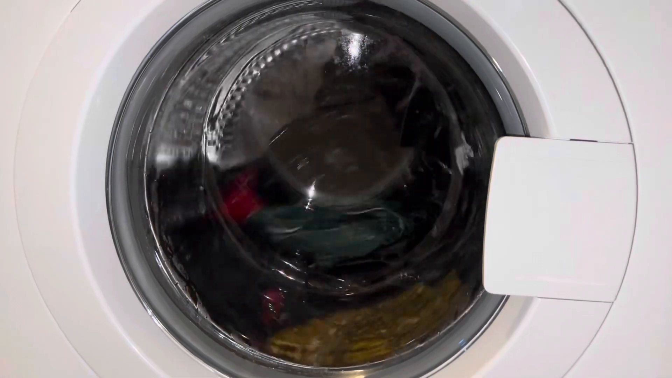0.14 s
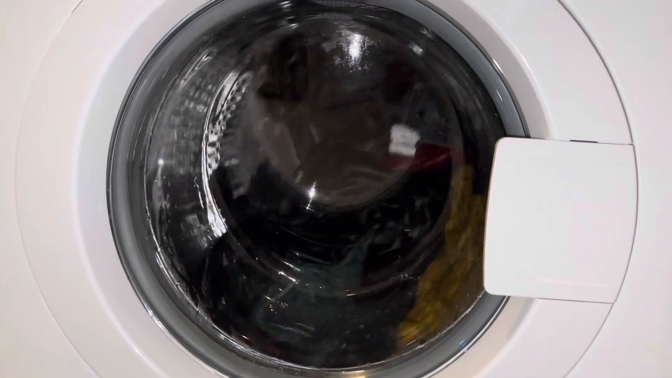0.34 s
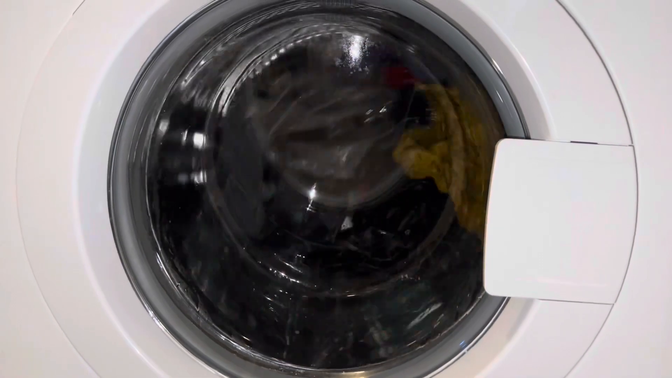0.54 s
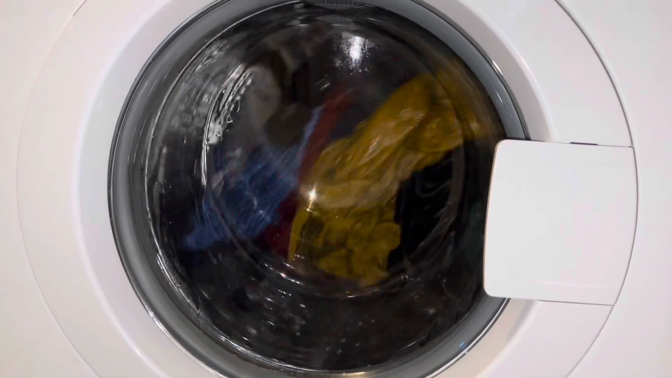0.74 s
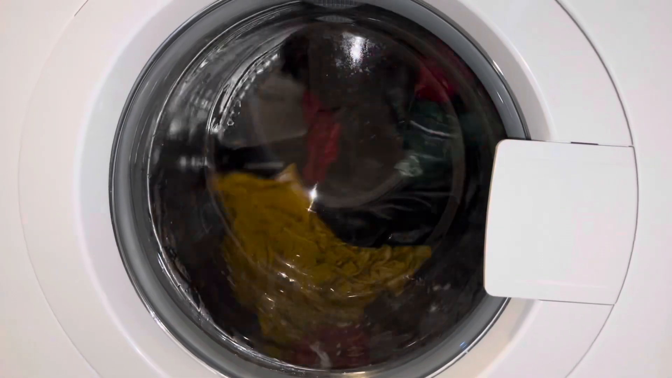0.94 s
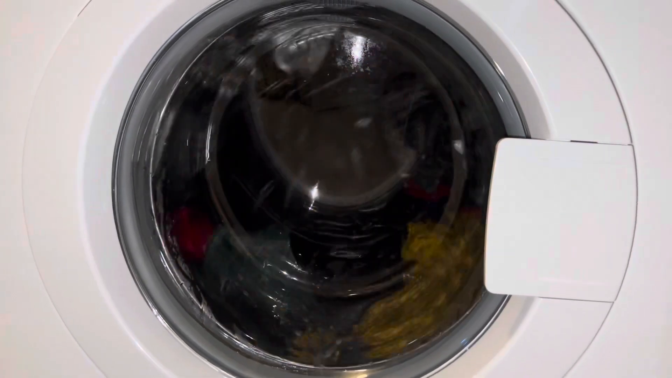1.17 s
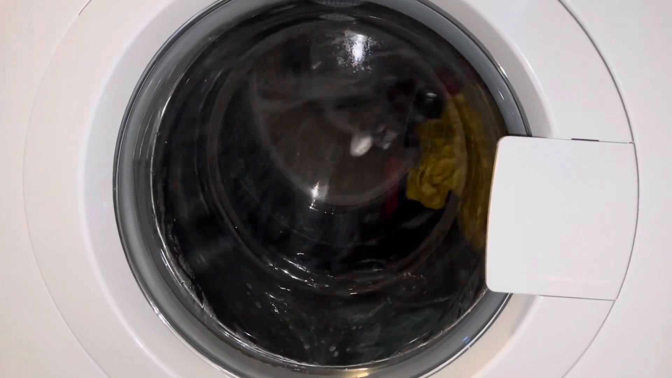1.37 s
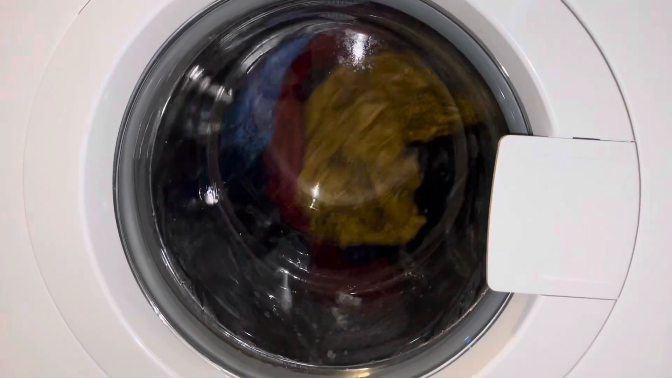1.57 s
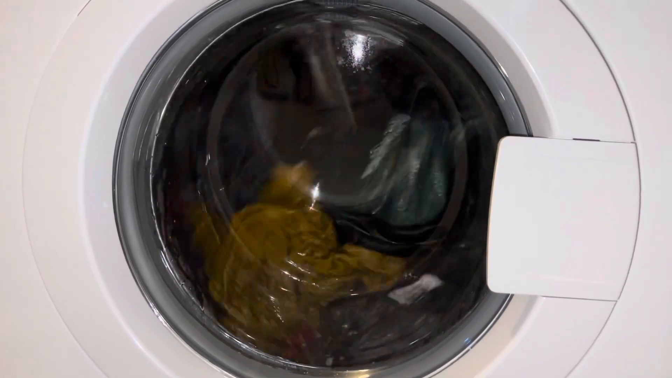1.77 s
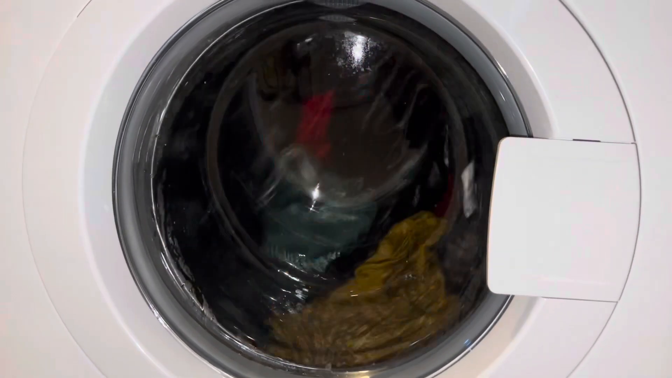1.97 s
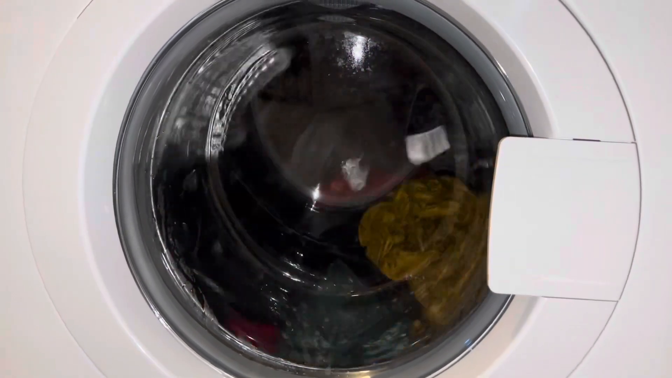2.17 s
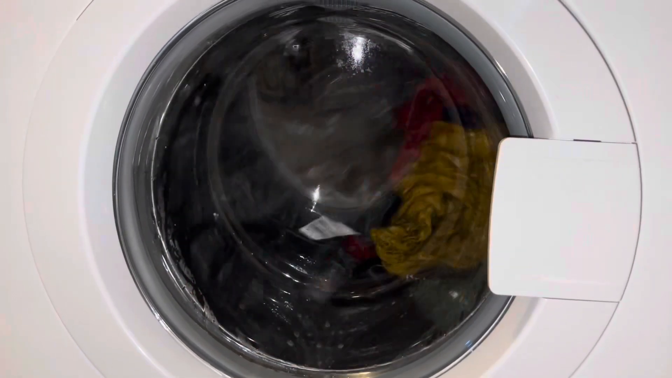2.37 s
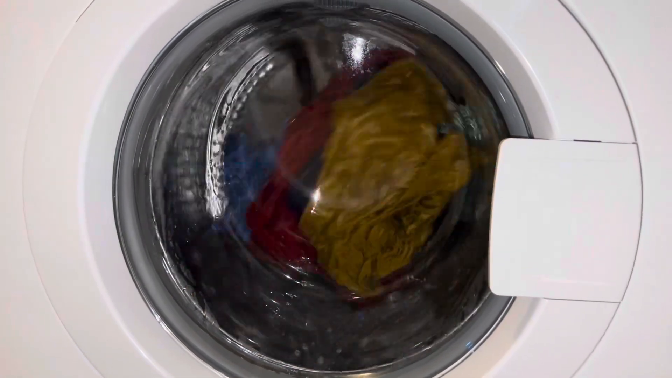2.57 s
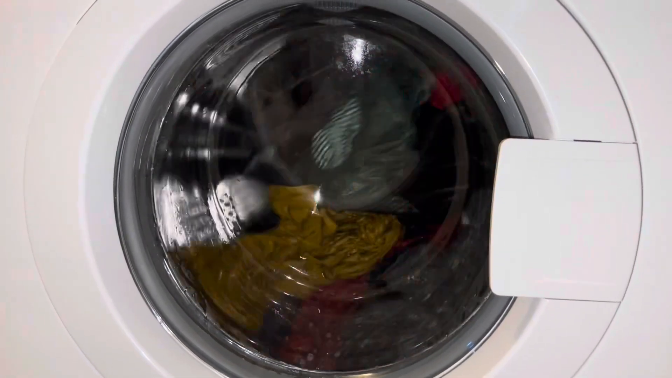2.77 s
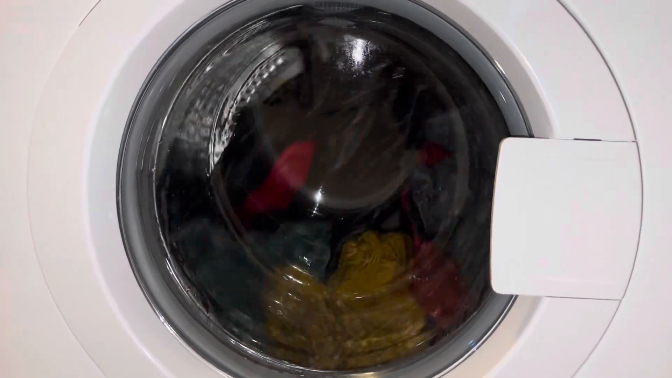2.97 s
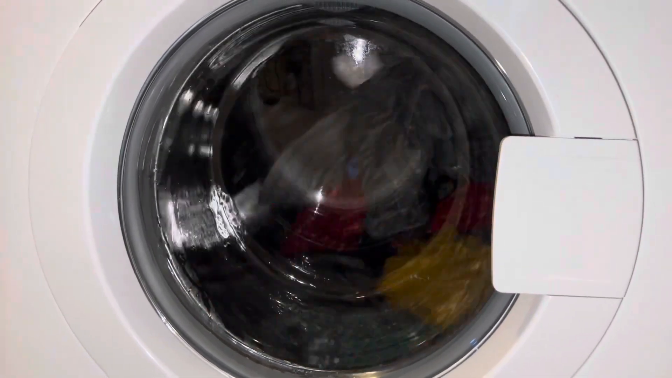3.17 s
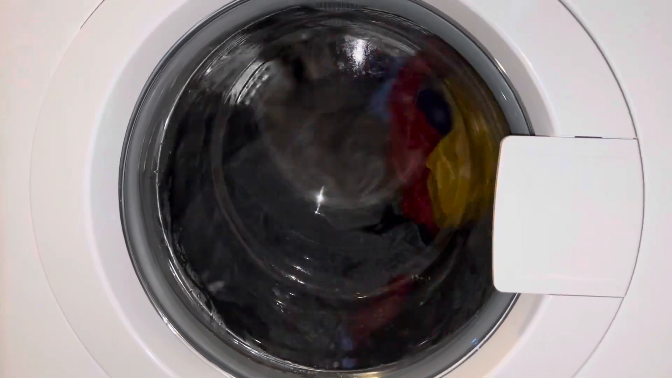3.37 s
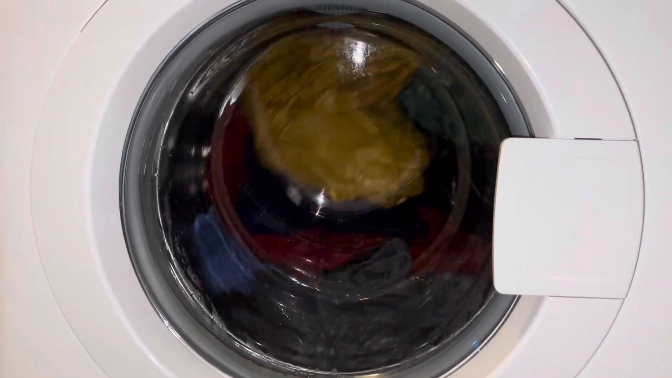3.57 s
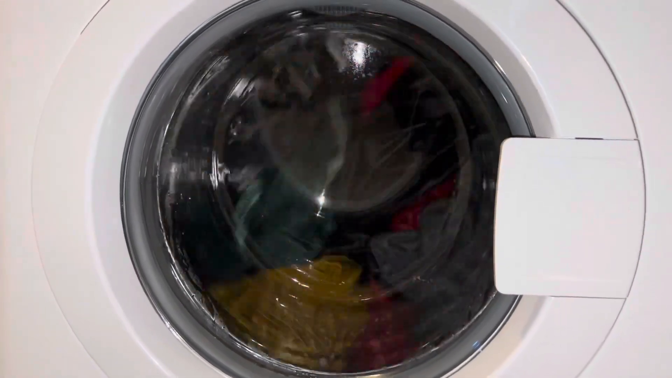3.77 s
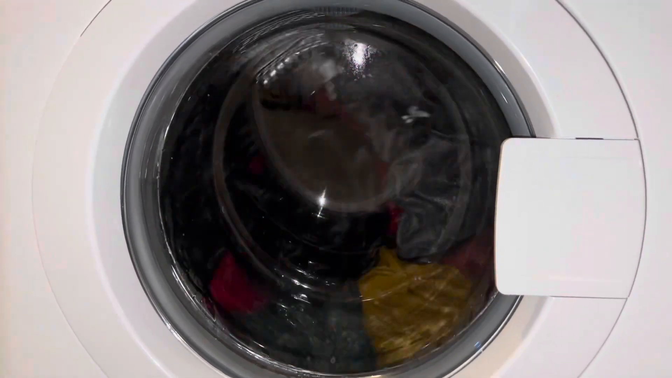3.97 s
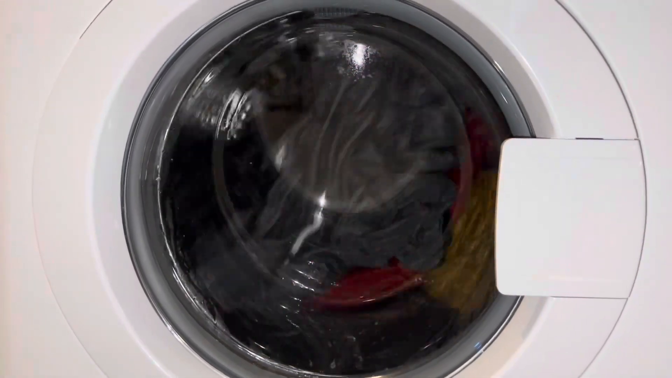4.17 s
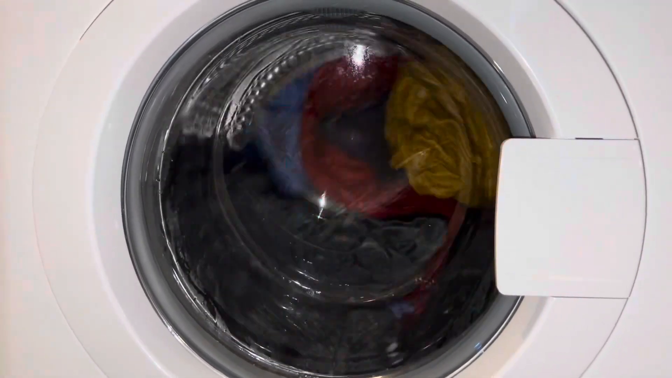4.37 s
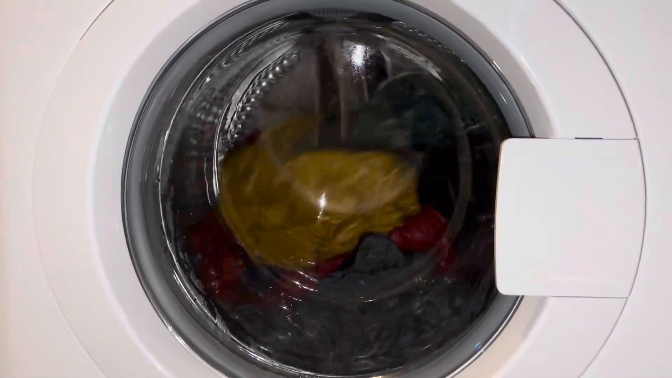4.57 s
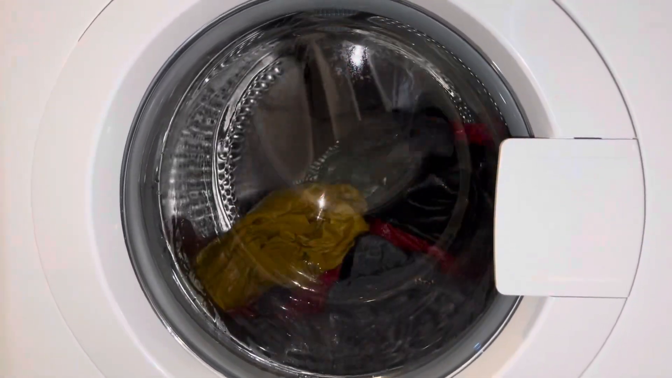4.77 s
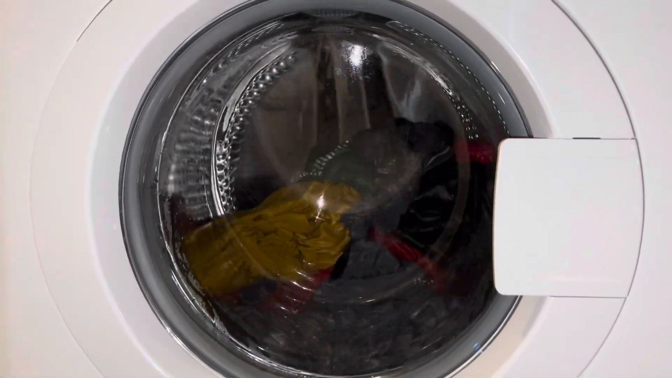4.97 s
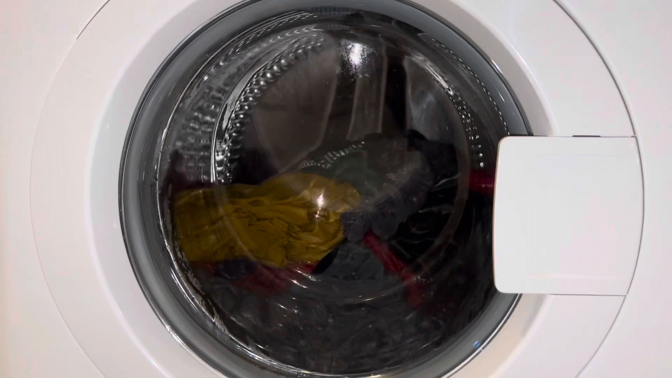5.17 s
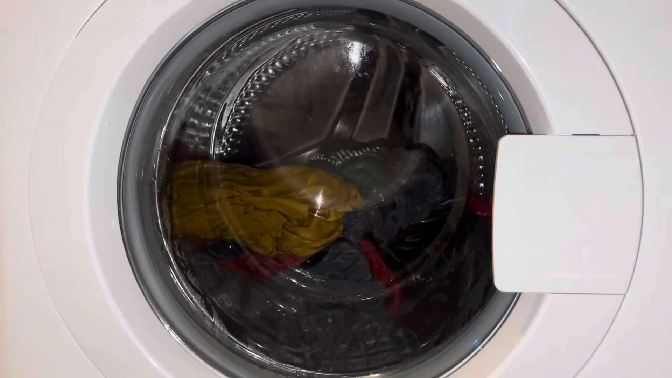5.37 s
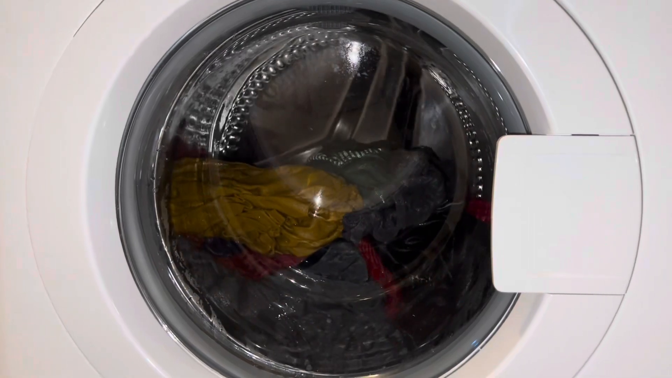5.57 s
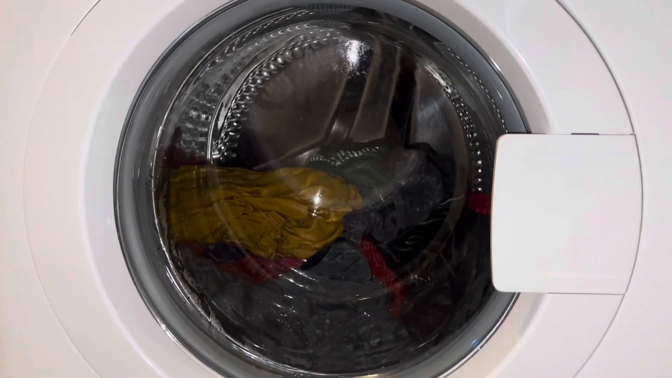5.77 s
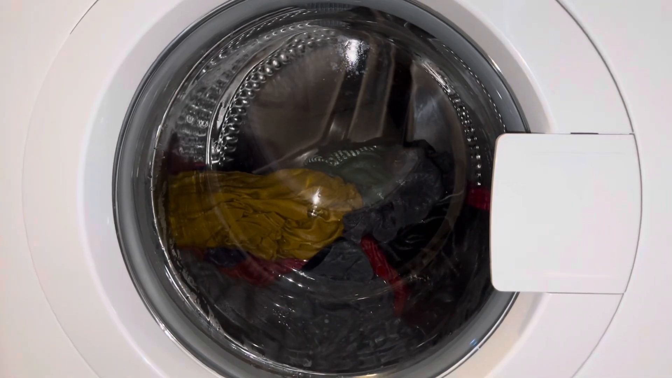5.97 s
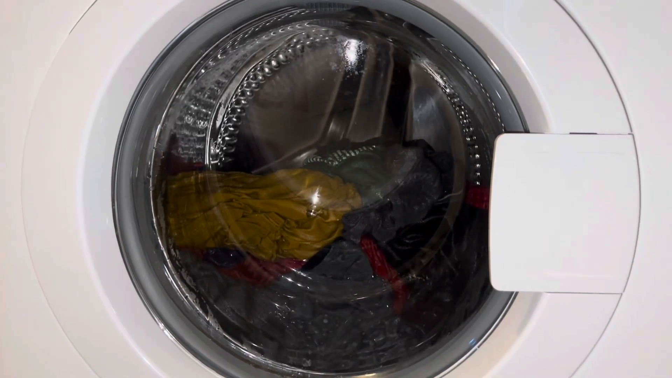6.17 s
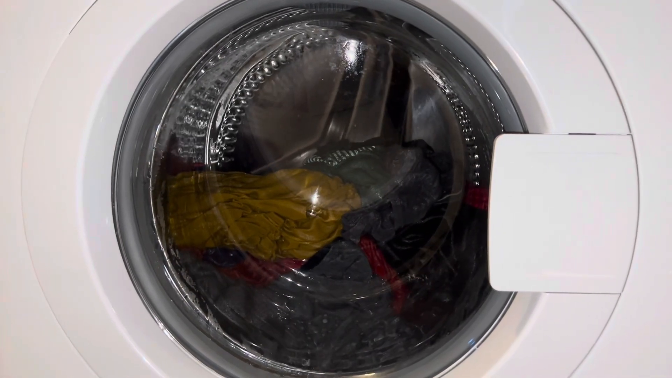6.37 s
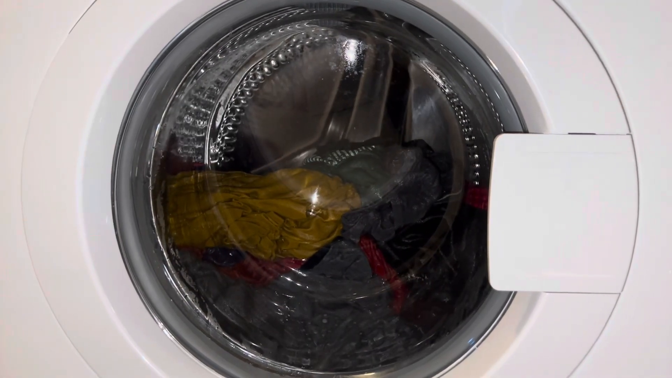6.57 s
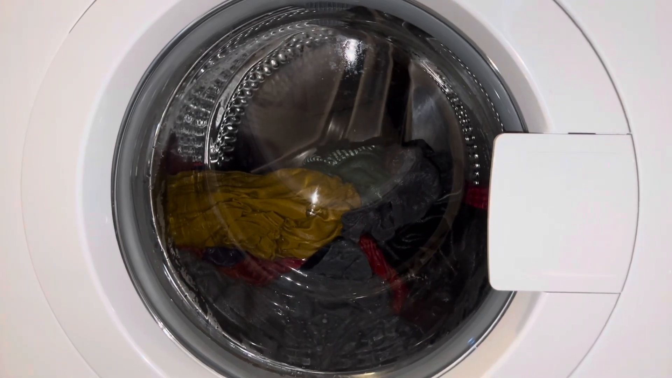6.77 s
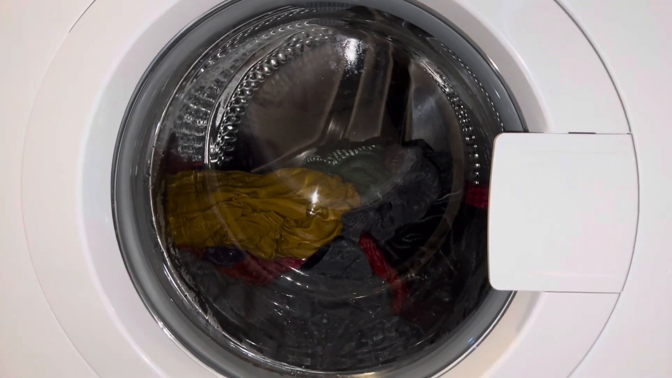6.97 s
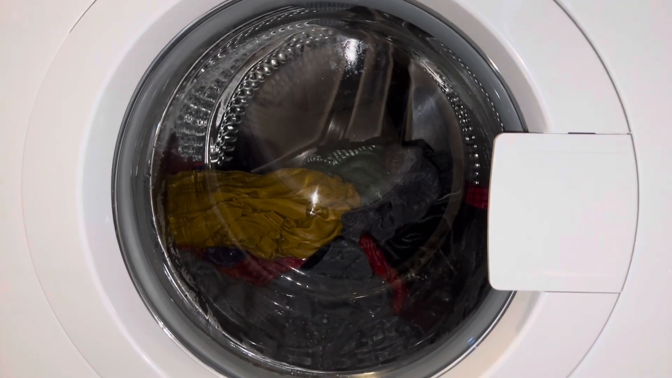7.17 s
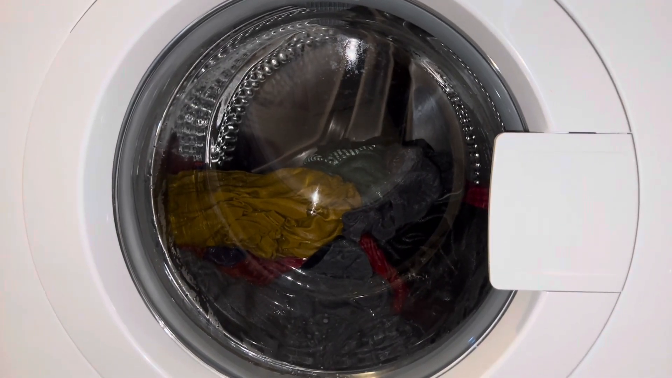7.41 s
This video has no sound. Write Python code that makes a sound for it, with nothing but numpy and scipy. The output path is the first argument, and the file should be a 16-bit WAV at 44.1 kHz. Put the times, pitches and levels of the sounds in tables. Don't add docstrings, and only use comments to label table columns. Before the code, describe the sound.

Close in front of a front-loading washer in a small hard room, a steady low electric hum and a wavering, buzzing motor whine run under sloshing water and irregular dull slaps and thuds of wet cloth. After over four seconds the motor cuts off abruptly and the drum comes to rest. The heap slips softly, water glugs faintly, then a single relay click snaps over quiet room hiss.

```python
import sys
import numpy as np
from scipy import signal
from scipy.fft import rfft, irfft
from scipy.io import wavfile
from scipy.ndimage import uniform_filter1d

SR = 44100
rng = np.random.default_rng(int(sys.argv[2]) if len(sys.argv) > 2 else 0)


def voltage_ratio(decibels):
    exponent = np.asarray(decibels, float) / 20
    return 10 ** exponent


def wav_record(signal):
    frames = np.transpose(np.atleast_2d(signal))
    bounded = np.clip(frames, -1, 1)
    quanta = np.round(bounded * 32767).astype(np.int16)
    wavfile.write(sys.argv[1], SR, quanta)


N = 328104
TIME_S = np.arange(N) / SR


def unit(x):
    return x / np.sqrt(np.mean(x ** 2) + 1e-20)


def in_time(rows):
    s, *columns = np.transpose(rows)
    return [np.interp(TIME_S, s, c) for c in columns]


def at_hz(points, hz):
    point_hz, value = np.array(points)[:, :2].T
    return np.interp(np.log(hz), np.log(np.maximum(point_hz, 1)), value)


def drift(rate):
    r = np.exp(-80 * np.pi * rate / SR)
    slow = signal.lfilter([1], [1, -2 * r, r * r], rng.standard_normal(N // 40 + 2002))[2000:]
    return np.interp(np.arange(N) / 40, np.arange(len(slow)), unit(slow))


def pan(db):
    return voltage_ratio(np.array([[.5], [-.5]]) * db)


def resonance(x, hz, width_hz):
    r = np.exp(-np.pi * width_hz / SR)
    poles = [1, -2 * r * np.cos(2 * np.pi * hz / SR), r * r]
    return signal.lfilter(np.array([1, 0, -1]) * (1 - r * r) / 2, poles, x)


# hz, left_right_likeness (ratio)
LIKENESS = [(60, 2), (130, 0.5), (290, 1.34), (640, 0.47), (1410, -0.25), (3100, 0.1), (6820, 0.37),
            (15000, -12)]


def pair(hz, length, wide=1):
    mid, side = rng.standard_normal((2, length))
    alike = np.clip(at_hz(LIKENESS, hz) / wide, 0, 1)
    return np.sqrt(.5 + alike / 2) * mid + np.sqrt(.5 - alike / 2) * side * [[1], [-1]]


def coloured(spectrum, lean, patchy_db=0, wide=1, same=1):
    hz = np.maximum(np.fft.rfftfreq(N, 1 / SR), 1)
    mid, apart = rfft(rng.standard_normal((2, N))) * voltage_ratio(at_hz(spectrum, hz))
    paths = np.interp(hz, np.arange(150) * 150, np.cumsum(rng.normal(0, 1.2, 150)))
    same = np.clip(same, 0, 1)
    side = np.sqrt(same) * mid * 1j * np.sign(np.sin(paths)) + np.sqrt(1 - same) * apart
    alike = np.clip(at_hz(LIKENESS, hz) / wide, .1, .98)
    both = np.sqrt(1 + alike) * mid + np.sqrt(1 - alike) * side * [[1], [-1]]
    both = both * pan(at_hz(lean, hz))
    if not patchy_db:
        return unit(irfft(both, N))
    out, together = 0, drift(1.9)
    for centre in np.arange(np.log2(spectrum[1][0]) - .5, np.log2(spectrum[-2][0]) + 1):
        share = np.cos(np.pi / 2 * np.clip(np.log2(hz) - centre, -1, 1)) ** 2
        out = out + irfft(both * share, N) * voltage_ratio(patchy_db * (1.04 * together + drift(7.6)))
    return unit(out)


def burst(rise_s, t60):
    t = np.arange(int((rise_s + t60) * SR)) / SR
    rise = np.sin(np.pi / 2 * np.minimum(t / rise_s, 1)) ** 2
    return rise * voltage_ratio(-60 * np.maximum(t - rise_s, 0) / t60)


def add(out, s, sound):
    i = int(s * SR)
    out[:, i:i + sound.shape[-1]] += sound[..., :N - i]


MAINS_HZ = 99.97
POWER_CUT_S, HUM_RING_S = 4.35, 0.18
MEAN_EFFORT_DB = -35
# start_s, level_db
EFFORT = [(0.0, -44.5), (0.25, -34.5), (0.48, -30.5), (0.55, -35.5), (1.25, -32.5), (1.33, -36),
          (1.59, -36), (1.8, -44), (1.99, -37.5), (2.22, -38.5), (2.34, -33), (2.56, -39.5), (3.19, -34.5),
          (3.34, -37.5), (3.46, -36.5), (3.69, -39), (4.03, -35.5), (4.36, -41)]
# start_s, level_db
SWAY = [(0, -7.5), (.3, -4.5), (.55, 1), (1.15, -5), (1.3, -2), (2.3, -3), (3.1, 0), (3.28, -7.5),
        (3.45, -1.5), (4.3, -1)]
# multiple of the pull, level_db at mean effort, effort_share, sway_share, left_right_db
HUM_LINES = [(1, -39, 0.72, 0.97, -1), (2, -34.5, 0.95, .01, -3.5), (3, -50.5, 0.4, 1.2, -9.5),
             (4, -57, 0.76, 1, 4)]


def hum():
    turn = 2 * np.pi * MAINS_HZ * TIME_S
    cut_s = np.maximum(TIME_S - POWER_CUT_S, 0)
    swing_db, sway_db = in_time(EFFORT)[0] - MEAN_EFFORT_DB, in_time(SWAY)[0]
    out = 0
    for k, db, follows, sways, lean_db in HUM_LINES:
        line = np.sin(k * turn + 0.48 * drift(4.7))
        level_db = db + 3.5 + follows * swing_db + sways * sway_db + 1.29 * drift(19.0)
        out = out + pan(lean_db) * line * voltage_ratio(level_db - 60 * k * cut_s / HUM_RING_S)
    return out


TONE_DB, TONE_WANDER_DB = -54.5, 1.5
STRAND_WAVER = .0065
# bar_rate_share, level_db
STRANDS = [(1.004, 0), (.974, -5)]


def commutator_tone(speed_hz, press_db, chop):
    level_db = TONE_DB + 1.3 * press_db + TONE_WANDER_DB * drift(4.5)
    tone = 0
    for share, db in STRANDS:
        turn = 2 * np.pi * np.cumsum(speed_hz * (share + STRAND_WAVER * drift(17))) / SR
        port_phase = [[0], [1]] * (1.26 + 0.16 * drift(13))
        tone = tone + np.sin(turn + port_phase) * voltage_ratio(db + 2.6 * drift(18))
    return voltage_ratio(level_db + 2.5) * unit(tone * chop) * pan(-4.0)


BUZZ_DB = -51.5
LINE_FOLLOWS, LINE_WAVER = .07, .0012
# pitch_hz, width_hz, level_db
CABINET = [(1710, 12, -13), (1797, 28, -6.5), (1855, 28, -7), (1840, 37, -2.5), (1904, 27, -0.5),
           (2276, 24, 0), (2384, 15, -6), (2550, 24, 0), (2606, 40, -6.5), (2127, 26, -8), (2710, 25, -9),
           (2980, 22, -9.5), (3175, 18, -13.5), (2470, 21, -7), (3590, 22, -19.5), (2940, 21, -2),
           (3102, 40, -6.5), (3245, 28, -2), (3470, 24, -16), (3270, 8.4, -16.5), (3420, 16, -7),
           (3900, 41, -18), (4560, 21, -26), (7640, 250, -9), (8210, 82, -11), (8680, 40, -17.5)]


def spark_buzz(speed_hz, press_db, chop):
    running = int(4.6 * SR)
    sparks = pair(2760, running, wide=.35) * chop[:running]
    buzz = np.zeros((2, N))
    for hz, width_hz, db in CABINET:
        flicker_db = 2.06 * drift(6.6) + 0.35 * press_db * (hz < 2000)
        add(buzz, 0, voltage_ratio(db + flicker_db[:running]) * unit(resonance(sparks, hz, width_hz)))
    pace = 1 + LINE_FOLLOWS * (speed_hz / speed_hz.mean() - 1) + LINE_WAVER * drift(8.95)
    buzz = np.array([np.interp(np.cumsum(pace), np.arange(N), side) for side in buzz])
    return voltage_ratio(BUZZ_DB - 10.0) * buzz * pan(-1.3)


BRUSH_CUT_S, CUT_DB_PER_S = 4.31, 425
MEAN_BRUSH_DB = -54
# start_s, pitch_hz
SPEED = [(0, 1910), (.08, 1810), (.24, 1900), (.4, 1840), (.78, 1900), (.84, 1850), (1.485, 1815),
         (1.6, 1940), (1.8, 1830), (2.19, 1905), (2.26, 1815), (2.56, 1925), (2.85, 1850), (3.13, 1915),
         (3.24, 1830), (3.76, 1910), (3.9, 1870), (4.22, 1925)]
# start_s, level_db
BRUSH = [(0.0, -54.5), (1.39, -52), (1.58, -48.5), (1.64, -56), (1.7, -51), (2.11, -58.5), (2.15, -49.5),
         (2.3, -60), (2.35, -52), (3.04, -56), (3.11, -48.5), (3.2, -54.5), (3.34, -52), (3.41, -65),
         (3.48, -52.5), (4.08, -56), (4.17, -52), (4.3, -56)]


def whine():
    speed_hz = in_time(SPEED)[0]
    press_db = in_time(BRUSH)[0] - MEAN_BRUSH_DB
    chop = 1 + 0.056 * np.sin(2 * np.pi * MAINS_HZ * TIME_S)
    power_on = voltage_ratio(-CUT_DB_PER_S * np.maximum(TIME_S - BRUSH_CUT_S, 0))
    return (commutator_tone(speed_hz, press_db, chop) + spark_buzz(speed_hz, press_db, chop)) * power_on


RUMBLE_DB, RUMBLE_FOLLOWS = -50.5, 0.27
SLOSH_DB, SPRAY_DB, SPRAY_FOLLOWS = 3.5, -60.5, 0.26
REST_S, REST_DB_PER_S, SPRAY_STOP_DB_PER_S = 4.67, 101, 304
MEAN_CHURN_DB = -46.5
# start_s, level_db
CHURN = [(0.0, -48.5), (0.3, -47), (0.5, -46), (0.75, -44), (1.04, -48), (1.3, -44.5), (1.7, -44),
         (1.86, -45), (2.2, -47), (2.55, -45), (2.87, -49), (3.0, -46.5), (3.75, -45.5), (4.15, -45.5),
         (4.3, -46), (4.44, -50), (4.6, -53.5), (4.7, -50.5)]
# pitch_hz, density_db (dB per Hz)
RUMBLE = [(12, -54), (20, -36), (48, -5.5), (92, -9), (119, -18.5), (146, -4.5), (168, -20.5), (190, -10.5),
          (250, -37), (420, -120)]
# pitch_hz, density_db (dB per Hz)
SLOSH = [(130, -33), (215, -4.5), (290, -18.5), (572, -12.5), (680, -23), (830, -16.5), (1050, -19),
         (1200, -26), (1330, -26.5), (1620, -22.5), (2150, -25.5), (2800, -33), (4000, -37.5), (5500, -80)]
# pitch_hz, density_db (dB per Hz)
SPRAY = [(2000, -8), (3400, -15), (4820, -8), (6090, -3), (7220, -6.5), (8520, -8), (9400, -9),
         (11000, -5.5), (13000, -29), (15000, -12.5), (16500, -5)]
# pitch_hz, width_hz, level_db
DRUM_HUM = [(301, 50, -7), (562, 76, -8.5), (800, 66, -9.5), (1077, 86, -10.5), (1310, 37, -15.5),
            (1707, 40, -20.5)]
# pitch_hz, left_right_db
LEAN = [(60, -8), (110, -7), (200, -0.5), (380, -4), (700, -4.5), (1290, 4), (2380, -7), (4400, 0.5),
        (8120, 4), (15000, -5)]


def tumble():
    churn_db = in_time(CHURN)[0]
    swing_db = churn_db - MEAN_CHURN_DB
    resting_s = np.maximum(TIME_S - REST_S, 0)
    rumble = voltage_ratio(RUMBLE_DB + RUMBLE_FOLLOWS * swing_db) * coloured(RUMBLE, [(60, -.2), (190, -1.5)])
    rings = 0
    for hz, width_hz, db in DRUM_HUM:
        rings = rings + voltage_ratio(db + 2.9 * drift(8.2)) * unit(resonance(pair(hz, N), hz, width_hz))
    slosh = voltage_ratio(-1.5) * coloured(SLOSH, LEAN, patchy_db=2.5) + voltage_ratio(-4.0) * pan(-0.81) * rings
    slosh = voltage_ratio(churn_db + SLOSH_DB) * slosh
    spray_db = SPRAY_DB + SPRAY_FOLLOWS * swing_db - SPRAY_STOP_DB_PER_S * resting_s
    spray = voltage_ratio(spray_db) * coloured(SPRAY, LEAN, patchy_db=1.5)
    return (rumble + slosh) * voltage_ratio(-REST_DB_PER_S * resting_s) + spray


# start_s, peak_db, pitch_hz (loudest)
SLAPS = [(0.184, -24.5, 775), (0.393, -26.5, 553), (0.504, -32.5, 331), (0.63, -30.5, 333),
         (0.779, -31.5, 592), (0.892, -27.5, 330), (1.159, -30, 1020), (1.334, -32.5, 570),
         (1.424, -31.5, 316), (1.489, -58, 390), (1.618, -31.5, 565), (1.791, -27.5, 990),
         (2.098, -35, 500), (2.309, -38, 528), (2.387, -28, 520), (2.63, -26.5, 1020), (2.738, -29.5, 364),
         (2.757, -24, 500), (2.959, -32, 389), (3.128, -30.5, 510), (3.321, -32.5, 1090),
         (3.567, -31.5, 574), (3.666, -28, 550), (4.019, -30, 463), (4.237, -34, 500), (4.299, -30.5, 504),
         (4.339, -34, 487), (4.469, -33.5, 1030), (4.564, -31.5, 680), (4.656, -28, 1090)]
# pitch_hz, width_hz, level_db
DRUM = [(230, 82, -9), (399, 20, 4.5), (550, 17, -5.5), (844, 25, 0), (1063, 36, -4), (1420, 22, -2)]


def slaps():
    out = np.zeros((2, N))
    dull = signal.butter(4, [250, 1600], "band", fs=SR, output="sos")
    shape, core = burst(rise_s=0.042, t60=0.21), burst(rise_s=0.016, t60=0.11)
    late_core = np.interp(np.arange(len(shape)) - 0.024 * SR, np.arange(len(core)), core, 0, 0)
    shape = shape + 0.33 * late_core
    for s, db, hz in SLAPS:
        puff = pair(hz, len(shape)) * shape
        rings = 0
        for k, (mode_hz, width_hz, mode_db) in enumerate(DRUM):
            rings = rings + voltage_ratio(mode_db) * resonance(puff, mode_hz, width_hz) * (-1) ** k
        rings = signal.sosfilt(dull, rings + voltage_ratio(-12.0) * puff)
        rings = rings + voltage_ratio(-1.5) * resonance(puff, hz, 140)
        add(out, s - .032, voltage_ratio(db - 21.0) * pan(-0.94) * unit(rings))
    return out


# start_s, peak_db, pitch_hz (loudest)
PATS = [(.03, -42, 507), (.347, -40, 525), (.546, -38, 510), (.82, -35, 470), (.928, -40.5, 403),
        (1.14, -37.5, 1310), (1.297, -46, 330), (1.35, -30.5, 420), (1.49, -40, 1550), (1.519, -42, 1090),
        (1.561, -37, 315), (1.657, -31.5, 487), (1.92, -41, 510), (2.056, -39, 603), (2.171, -36, 500),
        (2.339, -33, 547), (2.44, -34.5, 1020), (2.632, -38, 410), (2.66, -34, 583), (3.0, -36, 325),
        (3.16, -45, 600), (3.239, -35, 880), (3.393, -47, 550), (3.49, -39, 1050), (3.58, -34, 800),
        (3.692, -31, 536), (3.775, -35, 520), (3.87, -34.5, 550), (3.9, -37, 1310), (3.966, -36.5, 800),
        (4.05, -38, 820), (4.279, -31.5, 546), (4.322, -33.5, 920), (4.335, -37.5, 1530),
        (4.385, -38.5, 1310), (4.585, -39, 686), (4.685, -41, 627)]


def pats():
    out = np.zeros((2, N))
    shape = burst(rise_s=0.011, t60=0.11)
    dull = signal.butter(2, [280, 1500], "band", fs=SR, output="sos")
    for s, db, hz in PATS:
        puff = pair(hz, len(shape)) * shape
        ring = resonance(resonance(puff, hz, 200), hz, 200) + voltage_ratio(-12.5) * signal.sosfilt(dull, puff)
        add(out, s - .006, voltage_ratio(db - 17.0) * pan(-1.3) * unit(ring))
    return out


# start_s, peak_db, pitch_hz
KNOCKS = [(.172, -34, 610), (.186, -32.5, 820), (.2, -35, 500), (.401, -41, 604), (1.163, -43, 1040),
          (.191, -32, 270), (4.44, -43, 276), (4.52, -45, 274), (2.64, -35, 1323), (2.638, -37, 720),
          (1.791, -37, 1015), (2.384, -36, 510), (2.632, -37, 1050), (2.66, -35, 603), (2.735, -39, 1300),
          (2.757, -31, 957), (2.765, -28, 415), (3.667, -36, 565), (4.322, -44, 565), (4.658, -35.5, 1030)]


def knocks():
    out = np.zeros((2, N))
    for s, db, hz in KNOCKS:
        shape = burst(rise_s=0.0053, t60=0.01 + 5.9 / hz)
        t = np.arange(len(shape)) / SR
        add(out, s - .003, voltage_ratio(db) * pan(-1.9) * shape * np.sin(2 * np.pi * hz * t * (1 + 3.3 * t)))
    return out


# start_s, peak_db, pitch_hz, panel_db (cabinet side panel)
THUDS = [(0.087, -47, 87, -46), (0.287, -38, 81.6, -49), (0.576, -40, 82, -44), (1.261, -36, 70.6, -47),
         (1.379, -43, 81.5, -57), (1.799, -40, 61, -43), (2.18, -46, 64, -50), (2.348, -50, 83.4, -48),
         (2.849, -54, 83.4, -59), (3.075, -39, 81, -36), (3.399, -53, 49.7, -66), (3.674, -49, 61.5, -52),
         (4.134, -47, 55, -48), (4.5, -48, 76, -72), (4.656, -61, 68, -48), (4.858, -56, 63.7, -77)]


def thuds():
    out = np.zeros((2, N))
    shape = burst(rise_s=0.0092, t60=0.35)
    t = np.arange(len(shape)) / SR
    for s, db, hz, panel_db in THUDS:
        tub = voltage_ratio(db + 1.0) * np.sin(2 * np.pi * hz * t)
        panel = voltage_ratio(panel_db + 1.5) * np.sin(2 * np.pi * 124 * t)
        add(out, s - .01, shape * (tub + panel))
    return out


# start_s, peak_db, pitch_hz (loudest), spread_db
SPLASHES = [(.537, -39.5, 2520, -42), (0.078, -48, 3800, 1), (1.153, -49, 3700, 0),
            (1.238, -45.5, 3800, -18), (1.239, -44, 2600, -31), (1.65, -45, 4650, -17),
            (1.667, -44, 3900, -22), (1.72, -50, 4540, 0), (1.8, -49, 3900, 1), (2.335, -49, 3750, -1),
            (2.389, -48, 3800, -6), (2.43, -52.5, 8200, -14), (2.627, -45.5, 3700, 1),
            (2.754, -47, 4080, -7), (2.912, -45.5, 8200, 2), (3.21, -58, 3800, -13),
            (3.399, -47, 4850, -24), (3.691, -50, 3580, -9), (3.958, -43, 7300, 4),
            (4.138, -51.5, 8500, -5), (4.322, -50, 3900, 2), (4.479, -55, 2660, -10),
            (4.659, -48, 2360, -20), (4.559, -49, 5810, 15), (4.598, -53, 3900, -15), (4.646, -52, 3900, 4)]


def splashes():
    out = np.zeros((2, N))
    bright = signal.butter(2, [2000, 8500], "band", fs=SR, output="sos")
    shape = burst(rise_s=0.0031, t60=0.13)
    for s, db, hz, spread_db in SPLASHES:
        puff = pair(hz, len(shape)) * shape
        spread = signal.sosfilt(bright, puff) + voltage_ratio(-13) * np.diff(puff, prepend=0)
        ring = resonance(resonance(puff * shape ** 0.61, hz, hz / 4.3), hz, hz / 4.3)
        add(out, s - .003, voltage_ratio(db - 14.5) * unit(voltage_ratio(spread_db) * spread + ring))
    return out


SLIDE_START_S, SLIDE_RISE_S, SLIDE_HOLD_S, SLIDE_FALL_S, SLIDE_DB = 4.727, 0.25, 0.25, 0.3, -68.5
# pitch_hz, density_db (dB per Hz)
SLIDE_HISS = [(1590, -8.5), (2700, -15), (3490, -10.5), (6510, -10.5), (9180, -25.5), (9770, -27),
              (10100, -40), (10900, -23), (13000, -29), (13600, -50), (22000, -120)]
# start_s, peak_db, pitch_hz
GLUGS = [(5.178, -58, 302), (5.219, -59, 850), (5.244, -54.5, 835), (5.261, -54, 375), (5.28, -51.5, 230),
         (5.283, -56, 516), (5.296, -59, 830), (5.306, -54, 230), (5.319, -59, 1000), (5.338, -65, 285),
         (5.34, -64, 1010), (5.388, -63, 230), (5.35, -63, 570), (5.405, -64, 320), (5.44, -65, 560),
         (5.48, -67, 420), (5.556, -65, 176), (5.868, -63, 286), (5.88, -66, 410), (5.9, -65, 280),
         (6.01, -66, 406), (6.14, -70, 380)]


def slide():
    corners_s = np.cumsum([0, SLIDE_RISE_S, SLIDE_HOLD_S, SLIDE_FALL_S])
    moving = np.interp(TIME_S - SLIDE_START_S, corners_s, [0.039, 1, 0.99, 0.14])
    out = moving * voltage_ratio(SLIDE_DB) * coloured(SLIDE_HISS, LEAN)
    for s, db, hz in GLUGS:
        shape, wet = burst(rise_s=0.0046, t60=0.013 + 4.6 / hz), burst(rise_s=0.0094, t60=0.37)
        t = np.arange(len(shape)) / SR
        blur = wet * unit(resonance(pair(hz, len(wet)), hz, 180))
        add(out, s, voltage_ratio(db - 12.0) * blur)
        add(out, s, voltage_ratio(db + 1.5) * shape * np.sin(2 * np.pi * hz * t * (1 + 2.0 * t)))
    return out


ROOM_T60_S = 0.34
# start_s, peak_db
RELAY = [
    (6.446, -32),
]
# pitch_hz, width_hz, level_db
RELAY_MODES = [(330, 220, 5), (748, 11, -1.5), (1090, 28, -7), (1600, 42, -4), (3000, 520, 0),
               (4600, 300, 3.5), (5430, 270, -3), (5950, 200, -13), (8560, 110, 1)]
# pitch_hz, density_db (dB per Hz)
RELAY_CRACK = [(60, -36), (150, -33), (361, 0), (1630, -7), (2100, -10), (3040, -4.5), (3700, -15),
               (8560, -4), (9150, -18), (9250, -22), (10400, -15), (10600, -15), (15300, -15), (17000, -23)]


def relay():
    (s, db), out = RELAY[0], np.zeros((2, N))
    shape = burst(rise_s=0.0052, t60=ROOM_T60_S)
    length = len(shape)
    hz = np.maximum(np.fft.rfftfreq(length, 1 / SR), 1)
    crack = unit(irfft(rfft(pair(930, length)) * voltage_ratio(at_hz(RELAY_CRACK, hz)), length))
    kick = pair(540, length)
    rings = 0
    for mode_hz, width_hz, mode_db in RELAY_MODES:
        decay = shape ** (0.86 + mode_hz / 8000)
        rings = rings + voltage_ratio(mode_db) * unit(resonance(kick, mode_hz, width_hz)) * decay
    low = signal.sosfilt(signal.butter(4, 6000, fs=SR, output="sos"), crack)
    snap = signal.sosfilt(signal.butter(4, 8000, "high", fs=SR, output="sos"), crack)
    tail = low * shape ** 0.72 + voltage_ratio(16) * snap * shape ** 3.2
    add(out, s - .002, voltage_ratio(db - 14.0) * (crack * shape ** 1.7 + voltage_ratio(-8.5) * rings + voltage_ratio(-7) * tail))
    return out


FAN_HZ, FAN_WIDTH_HZ, FAN_DB, FAN_LEAN_DB = 1730, 280, -74, 8.5


def fan():
    air = resonance(rng.standard_normal(N), FAN_HZ, FAN_WIDTH_HZ)
    air = unit(resonance(air, FAN_HZ, FAN_WIDTH_HZ))
    return voltage_ratio(FAN_DB) * pan(FAN_LEAN_DB) * [air, np.roll(air, 10)]


HISS_DB, HOUSE_DB = -68, -75.5
# pitch_hz, density_db (dB per Hz)
FLOOR = [(150, -34), (260, -8), (420, -6), (1300, -13.5), (1550, -9.5), (1750, -5.5), (2050, -11),
         (2500, -14), (2850, -28.5), (4800, -31.5), (5660, -25), (7300, -24.5), (8200, -45), (10500, -47),
         (12500, -44), (14000, -68)]
# pitch_hz, density_db (dB per Hz)
FLOOR_LOW = [(15, -45), (25, -27), (54, -2.5), (108, -1), (146, -7.5), (248, -13), (260, -21), (340, -57),
             (570, -120)]
# pitch_hz, left_right_db
FLOOR_LEAN = [(60, 9), (110, -7.5), (200, 2.5), (380, -1.5), (700, -1.5), (1290, 13.5), (2380, 10.5),
              (4400, 4), (8120, 26.5), (15000, 0)]
# middle_s, peak_db, length_s
SHUDDERS = [
    (4.847, -64, 0.081),
    (5.295, -74, 0.3),
    (6.006, -79, 0.19),
    (6.533, -67, 0.1),
    (7.347, -74, 0.092),
]


def room():
    rumble = voltage_ratio(HOUSE_DB)
    for s, db, length_s in SHUDDERS:
        rumble = rumble + voltage_ratio(db) * np.exp(-((TIME_S - s) / length_s) ** 2)
    hiss = voltage_ratio(HISS_DB) * coloured(FLOOR, FLOOR_LEAN, wide=2.2, same=.15)
    return hiss + fan() + rumble * coloured(FLOOR_LOW, FLOOR_LEAN)


def scene():
    machine = hum() + whine() + tumble()
    load = slaps() + pats() + knocks() + thuds() + splashes() + slide()
    return machine + load + relay() + room()


def roll_off(x):
    return signal.sosfilt(signal.butter(12, 17050, fs=SR, output="sos"), x)


FULL_BAND_HZ = 9620
QUIET_DB = -62
PORT_LAG_S, PORT_IN_STEP_HZ = .0003, 8500
# pitch_hz, alike_share
PORT_LIKENESS = [(6800, 0), (7600, .3), (8400, .92), (9100, .55), (9700, .6), (10200, .95), (11100, .3),
                 (11600, .95), (12400, .95), (13000, .5), (13800, .9)]
# low_hz, high_hz, open_share (of time)
PATCHES = [(10450, 11000, .45), (11000, 11750, .6), (11750, 12400, .12), (12400, 13200, .3),
           (14500, 15100, .7), (15100, 15780, .85)]
# low_hz, high_hz
OUT_OF_STEP = [(0, 11300), (12900, 15050)]


def record(dry):
    hz, t, cells = signal.stft(dry, SR, nperseg=1024)
    alike = np.interp(hz, *np.transpose(PORT_LIKENESS))[:, None]
    late = np.exp(2j * np.pi * PORT_LAG_S * (hz[:, None] - PORT_IN_STEP_HZ))
    cells[1] = np.sqrt(alike) * late * cells[0] + np.sqrt(1 - alike) * cells[1]
    kept = np.repeat((hz < FULL_BAND_HZ)[:, None] * 1., len(t), axis=1)
    quiet = np.mean(np.abs(cells[:, hz < 400]) ** 2, axis=(0, 1)) < voltage_ratio(2 * QUIET_DB)
    for low, high, share in PATCHES:
        band = (hz > low) & (hz < high)
        power = uniform_filter1d(np.mean(np.abs(cells[:, band]) ** 2, axis=(0, 1)), size=2)
        leaps = power > 3 * uniform_filter1d(power, size=40)
        luck = uniform_filter1d(rng.standard_normal(len(t)), size=3)
        open_now = luck < np.quantile(luck, share)
        sparse = voltage_ratio(6.5) * (rng.random((band.sum(), len(t))) < .2)
        kept[band] = np.where(leaps | quiet, voltage_ratio(-5.0), open_now * sparse)
    apart = sum((hz >= low) & (hz < high) for low, high in OUT_OF_STEP)
    apart = apart * voltage_ratio(np.where(hz > OUT_OF_STEP[1][0], -2.5, 0))
    mid = (cells[0] + cells[1]) / 2 * kept
    side = (cells[0] - cells[1]) / 2 * apart[:, None]
    mix = signal.istft(np.array([mid + side, mid - side]), SR)[1][:, :N]
    return roll_off(mix)


dry = scene()
out = record(dry)
wav_record(out)
```